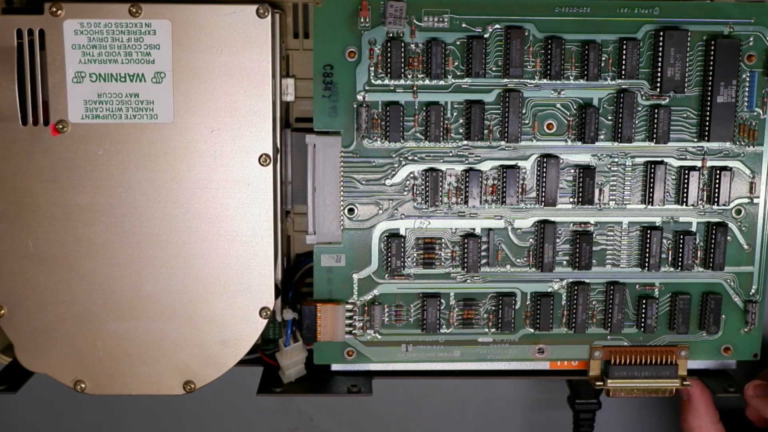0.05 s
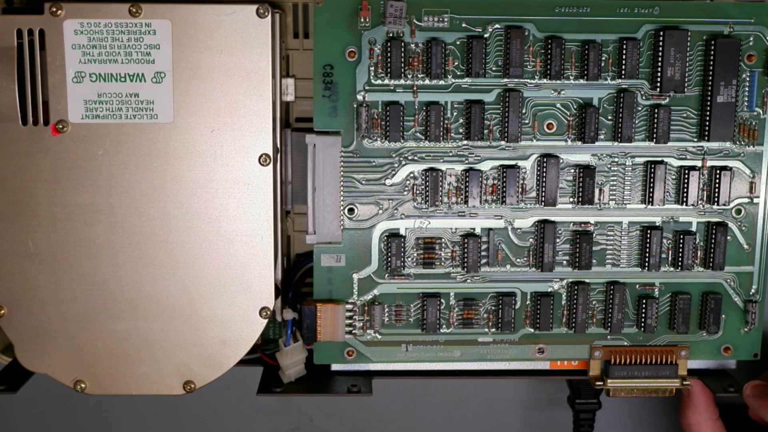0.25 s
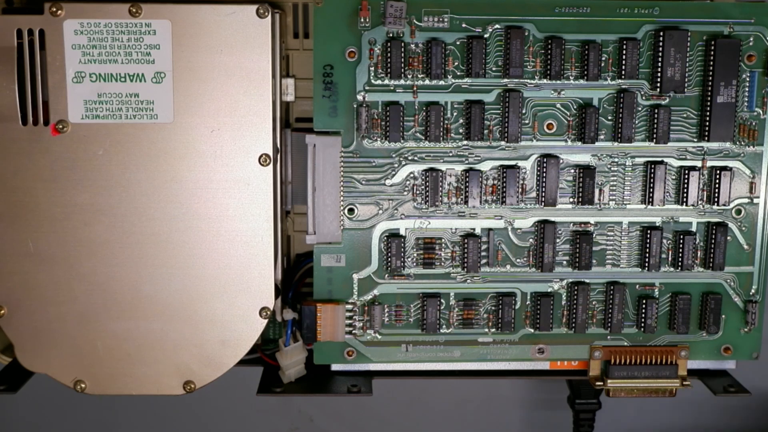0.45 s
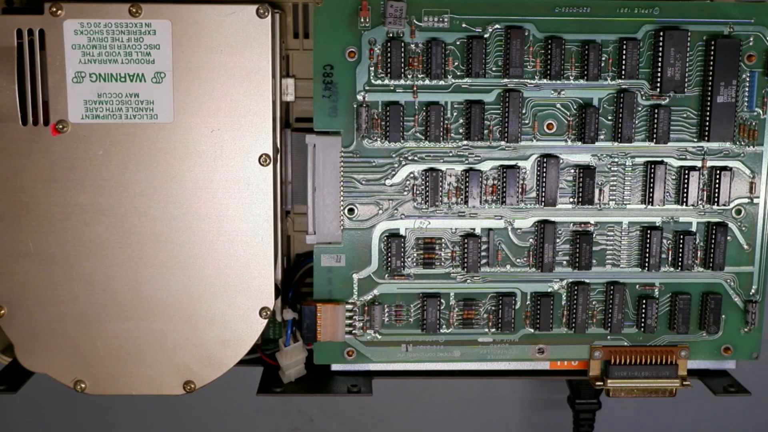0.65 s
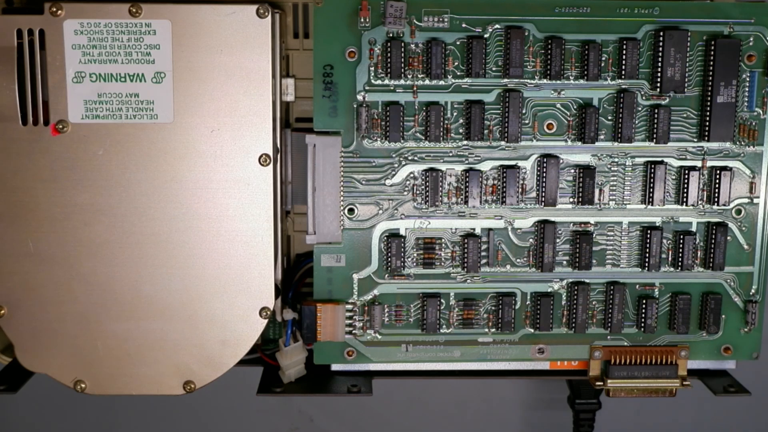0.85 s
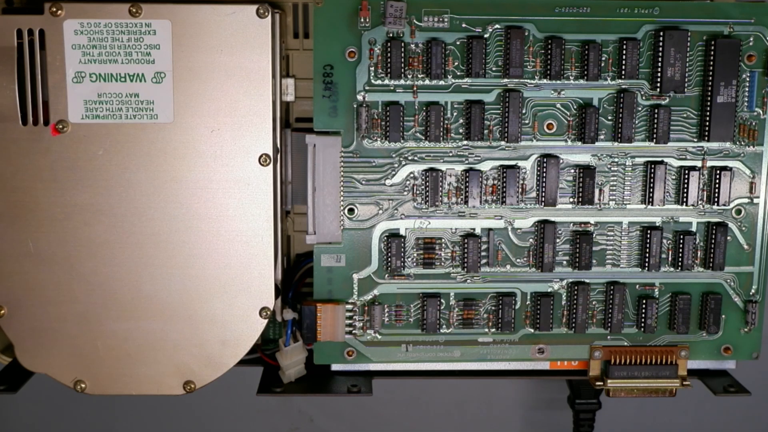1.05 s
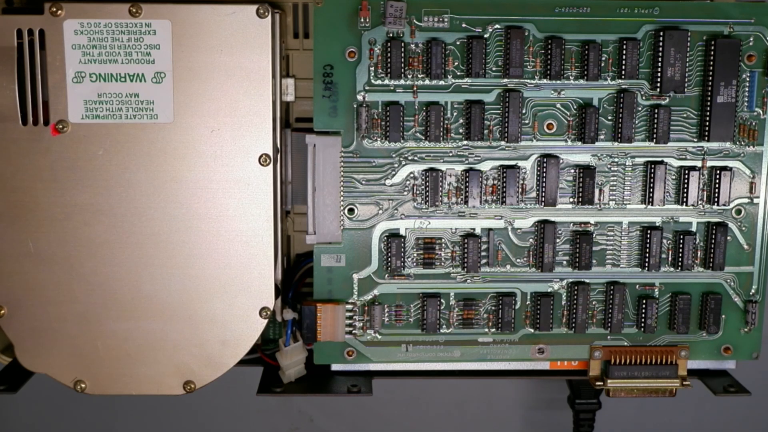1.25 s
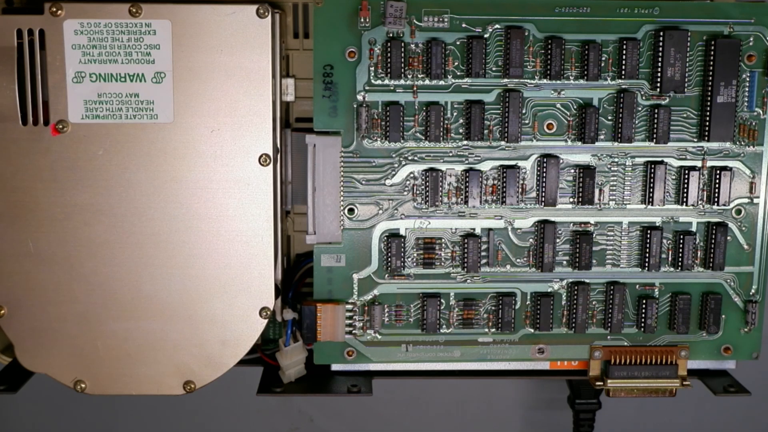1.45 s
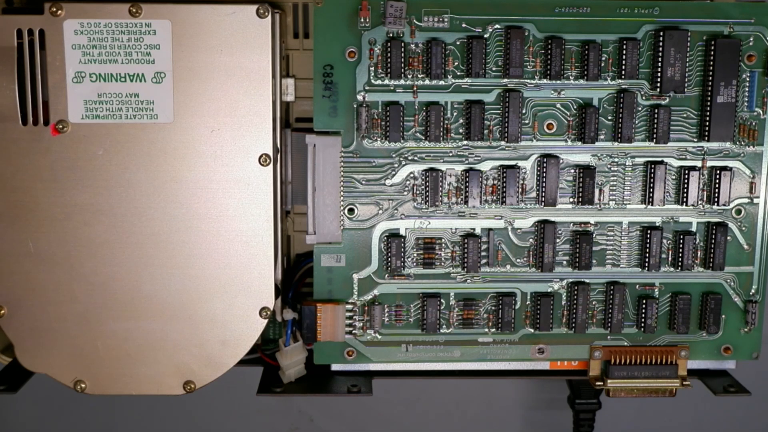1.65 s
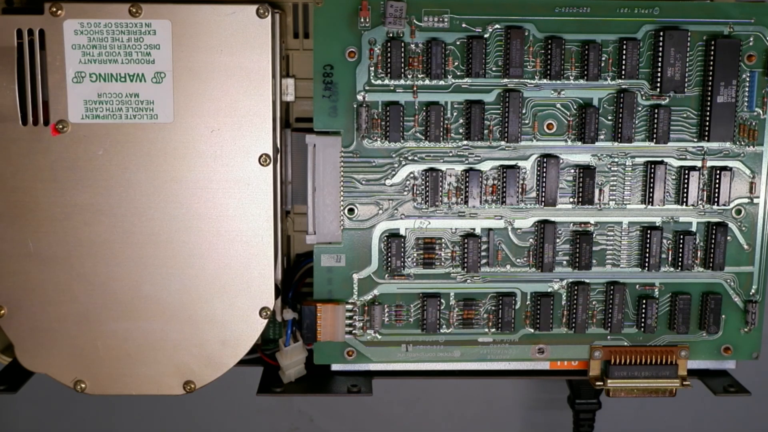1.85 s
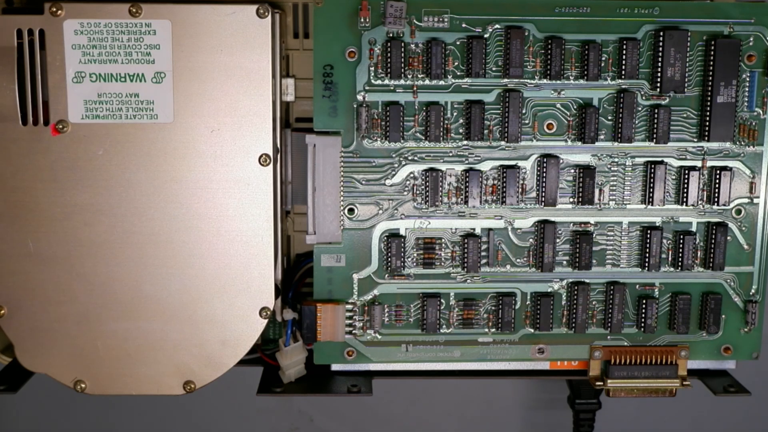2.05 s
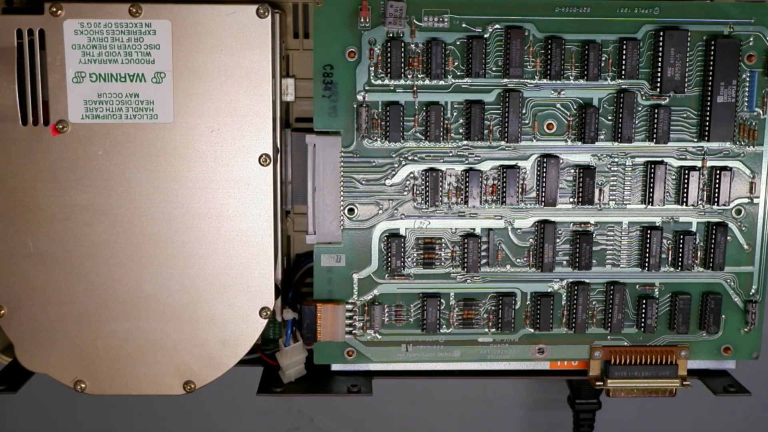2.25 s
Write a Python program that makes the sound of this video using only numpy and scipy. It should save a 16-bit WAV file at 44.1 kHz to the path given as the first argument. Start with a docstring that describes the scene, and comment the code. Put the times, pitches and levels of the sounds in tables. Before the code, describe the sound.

A hard disk drive starts up, heard close in a quiet room. A finger ticks lightly on the power switch, which snaps loudly at about 0.2 seconds, followed by a tiny high squeak. Around 0.7 seconds the disk scuffs loose and begins turning, far quieter than the click. Its bearing groans in uneven throbs while hiss, rasp and a low rising hum grow until about 2.4 seconds.

```python
"""Hard disk drive starting up

An open drive on a bench in a quiet room, one microphone close by. A finger ticks against the power
switch, snaps it over and slips off with a tiny squeak. The spindle breaks loose and gathers speed:
its bearing groans in uneven throbs through the casing, a rasp and a hiss grow, and the rising motor
hum sweeps through a resonance of the chassis."""
import sys
import numpy as np
from scipy import signal
from scipy.fft import rfft, irfft
from scipy.io import wavfile

SR = 44100
rng = np.random.default_rng(int(sys.argv[2]) if len(sys.argv) > 2 else 0)


def dump(signal):
    """Clip the signal to [-1, 1] and save it as 16-bit WAV at the path in sys.argv[1]."""
    limited = np.clip(np.atleast_2d(signal).T, -1, 1)
    pcm = np.round(limited * 32767).astype(np.int16)
    wavfile.write(sys.argv[1], SR, pcm)


N = 105840
TIME = np.arange(N) / SR


def from_db(db):
    """Decibels to gain."""
    return 10 ** (np.asarray(db) / 20)


def unit_rms(x):
    """Scale to rms 1."""
    return x / np.sqrt(np.mean(x ** 2) + 1e-20)


def level(curve):
    """Gain along a curve of (time [s], level [dB]), silent before it begins."""
    return from_db(np.interp(TIME, *np.transpose(curve), left=-140))


def noise(colour):
    """Noise of rms 1 with a colour of (frequency [Hz], relative level [dB])."""
    hz, db = np.transpose(colour)
    bins_hz = np.maximum(np.arange(N // 2 + 1) * SR / N, 1)
    gain = from_db(np.interp(np.log(bins_hz), np.log(hz), db))
    return unit_rms(irfft(rfft(rng.standard_normal(N)) * gain, N))


def wobble(rate_hz):
    """Random drift of rms 1, up to about the given rate."""
    lowpass = signal.butter(2, rate_hz, fs=SR, output="sos")
    return unit_rms(signal.sosfilt(lowpass, rng.standard_normal(N)))


def tone(hz, wander_hz):
    """A sine of height 1 whose pitch wanders a little."""
    return np.sin(2 * np.pi * np.cumsum(hz + wander_hz * wobble(20.3)) / SR)


def friction(resonances):
    """Friction noise of rms 1, coloured by resonances."""
    out = 0
    for hz, width, db in resonances:
        radius = np.exp(-np.pi * width * np.sqrt(2) / SR)
        band = [1 - radius, 0, radius - 1, 1, -2 * radius * np.cos(2 * np.pi * hz / SR), radius ** 2]
        out += from_db(db) * unit_rms(signal.sosfilt([band, band], rng.standard_normal(N)))
    return unit_rms(out)


def decay(start, t60_s):
    """An envelope that jumps to 1 and dies away."""
    return (TIME >= start) * np.exp(-np.log(1000) * np.maximum(TIME - start, 0) / t60_s)


def struck(start, modes):
    """Modes set ringing by one contact, each with a random sign."""
    out = 0
    for hz, db, t60_s in modes:
        envelope = from_db(db) * decay(start, t60_s)
        out += rng.choice([-1, 1]) * envelope * np.sin(2 * np.pi * hz * (TIME - start))
    return out


# Room tone around the bench: (frequency [Hz], relative level [dB])
ROOM_COLOUR = [(15, 8), (35, -3.5), (60, 2), (100, -10.5), (300, -13.5), (800, -17), (2000, -21.5),
               (6000, -24), (12000, -26.5), (16000, -36.5)]

def room(mains_hz=60):
    """The quiet room behind the drive: low rumble and a trace of mains hum."""
    return from_db(-61) * noise(ROOM_COLOUR) + from_db(-69.5) * np.sin(2 * np.pi * mains_hz * TIME)


# Skin on the lever: (time [s], level [dB])
RUB_LEVEL = [(0.185, -62), (0.194, -57.5), (0.3, -57.5), (0.42, -61.5), (0.52, -66.5), (0.62, -73.5),
             (0.7, -97)]
# Its colour: (frequency [Hz], relative level [dB])
RUB_COLOUR = [(100, 0.5), (700, 3.5), (1400, 4), (2500, 5), (5000, -1), (11000, -0.5), (16000, -3.5)]

def finger_rub():
    """A fingertip slides over the switch lever, faint even this close."""
    return level(RUB_LEVEL) * noise(RUB_COLOUR)


# The slipping fingertip: (time [s], pitch [Hz], relative level [dB])
SQUEAK_GLIDE = [(0.3425, 6300, -60), (0.3458, 7500, -42), (0.3478, 10600, -30), (0.350, 12300, -29),
                (0.353, 13000, -41), (0.358, 13200, -65)]
# Ring after the squeak: (frequency [Hz], relative level [dB])
SQUEAK_RING_COLOUR = [(4000, -18), (8500, -22), (11000, -4), (12300, -6), (13400, -3), (15000, -21)]
# Ping as the finger lets go: (frequency [Hz], level [dB], t60 [s])
PING_MODES = [(13400, -50, 0.1)]

def finger_squeak(spread_hz=1100):
    """The finger slips off: a narrow band of noise shoots upward and rings on from its peak."""
    times, hz, db = np.transpose(SQUEAK_GLIDE)
    phase = 2 * np.pi * np.cumsum(np.interp(TIME, times, hz)) / SR
    envelope = from_db(np.interp(TIME, times, db, left=-140, right=-140))
    band = wobble(spread_hz) * np.sin(phase) + wobble(spread_hz) * np.cos(phase)
    release = times[np.argmax(db)]
    ring = from_db(-44) * decay(release, t60_s=0.12) * noise(SQUEAK_RING_COLOUR)
    return envelope * band + ring + struck(release, PING_MODES)


# Finger ticks on the lever: (time [s], relative level [dB])
TICKS = [(0.139, -38.5), (0.1535, -47)]
# The lever's ring: (frequency [Hz], relative level [dB], t60 [s])
LEVER_MODES = [(2820, -17.5, .03), (5480, -21, 0.019), (6659, -17, .025), (8080, -3.5, 0.025),
               (8360, -10, 0.018)]
# The lever tipping: (time [s], level [dB])
CREAK_LEVEL = [(0.218, -64), (0.2215, -50), (0.2245, -54.5), (0.24, -130)]
# Its colour: (frequency [Hz], relative level [dB])
CREAK_COLOUR = [(80, 19.5), (300, 1), (1200, -7), (2600, 10), (4200, -7), (7500, -4.5), (11000, -10.5),
                (16000, -18)]

def switch_lever(attack_s=0.0016):
    """Two light touches ring the lever, then it creaks as it tips over."""
    ticks = 0
    for start, db in TICKS:
        attack = np.clip((TIME - start) / attack_s, 0, 1)
        ticks += from_db(db) * attack * struck(start, LEVER_MODES)
    return ticks + level(CREAK_LEVEL) * noise(CREAK_COLOUR)


# The snap and its bounces: (time [s], relative level [dB])
SNAPS = [(0.225, -13.5), (0.2256, -14), (0.229, -27.5)]
# Ring of switch and frame: (frequency [Hz], relative level [dB], t60 [s])
FRAME_MODES = [(162, -24, .17), (235, -29, .16), (845, -19, .09), (1000, -19, .11), (1853, -11, .1),
               (2137, -4, .048), (2596, -7, .085), (3139, -7, .04), (3575, -14, .07), (5467, -8, .05),
               (6256, -6, .04), (7128, -5, .058), (7610, -6, .056), (7772, -5, .052), (8765, -8, .045),
               (9892, -12, .1), (11380, -7, .055), (13383, -11, .068)]
# The crack, close up: (frequency [Hz], relative level [dB])
CRACK_COLOUR = [(60, -13), (180, -7), (450, -18.5), (1300, -13.5), (2400, 3.5), (4000, -9), (5200, 0.5),
                (8000, 1.5), (10500, -5), (13500, -2), (16000, -15.5)]
# The room's answer: (frequency [Hz], relative level [dB])
TAIL_COLOUR = [(100, -4), (300, -15.5), (600, -1.5), (1000, 8), (2700, -6.5), (4500, -1), (7000, -1),
               (9800, 7), (13500, -4.5), (16000, -14)]

def switch_snap():
    """The switch cracks over near the microphone and bounces; its first hit rings frame and room."""
    crack_power = sum((from_db(db) * decay(start, t60_s=0.035)) ** 2 for start, db in SNAPS)
    crack = from_db(0.5) * np.sqrt(crack_power) * noise(CRACK_COLOUR)
    first_hit, hit_db = SNAPS[0]
    ring = from_db(hit_db - 5.5) * struck(first_hit, FRAME_MODES)
    tail = from_db(-27) * decay(first_hit, t60_s=0.12) * noise(TAIL_COLOUR)
    return crack + ring + tail


# The spindle breaking loose: (time [s], level [dB])
SCUFF_LEVEL = [(0.715, -83), (0.742, -54), (0.765, -59), (0.8, -76)]
# Its colour: (frequency [Hz], relative level [dB])
SCUFF_COLOUR = [(200, -4), (550, -13), (820, 1.5), (1150, -10), (1500, -18), (2100, -10), (4000, -27),
                (10500, -21.5), (15000, -29)]
# Hiss of the turning spindle: (time [s], level [dB])
HISS_LEVEL = [(0.835, -76), (0.86, -58), (1.2, -56.5), (1.8, -56.5), (2.4, -55.5)]
# Its colour: (frequency [Hz], relative level [dB])
HISS_COLOUR = [(80, 5), (230, 3), (380, 3), (900, 2), (2200, -1), (3000, -2), (4500, -4), (7000, -7),
               (11000, -9), (15500, -10.5)]
# The growing rasp: (time [s], relative level [dB])
RASP_LEVEL = [(0.82, -92), (0.88, -71), (1.11, -69.5), (1.17, -61), (1.6, -57.5), (2.4, -52.5)]
# Its brief swells and one dip: (time [s], level change [dB])
RASP_SWELLS = [(1.5, 6), (1.695, -3), (1.835, 4.5), (1.9, 6), (1.995, 3.5), (2.105, 10), (2.18, 3),
               (2.254, 3), (2.375, 4.5)]
# Resonances of the cover: (frequency [Hz], nominal width [Hz], relative level [dB])
COVER_RESONANCES = [(780, 182, -3), (1136, 17, -3.5), (1268, 155, -2.5), (1381, 64, -6.5), (1620, 96, -6.5),
                    (1895, 217, 0)]

def spindle(swell_s=0.011, flutter_db=2.5):
    """The spindle scuffs free, then turns with a fluttering rasp in the cover and a smooth hiss."""
    scuff = level(SCUFF_LEVEL) * noise(SCUFF_COLOUR)
    swell_db = sum(db * np.exp(-0.5 * ((TIME - centre) / swell_s) ** 2) for centre, db in RASP_SWELLS)
    unevenness = from_db(swell_db + flutter_db * wobble(rate_hz=70))
    rasp = level(RASP_LEVEL) * unit_rms(friction(COVER_RESONANCES) * unevenness)
    hiss = level(HISS_LEVEL) * noise(HISS_COLOUR)
    return scuff + rasp + hiss


# The motor gathering speed: (time [s], pulse rate [Hz])
MOTOR_RATE = [(0.74, 14), (1.4, 77), (1.52, 83), (1.6, 92), (1.95, 119), (2.3, 150), (2.38, 161)]
# First and second order of its hum: (relative level [dB])
ORDERS_DB = [-71.5, -73.5]

def motor(chassis_hz=165, width_hz=5.8, lift_db=23.5):
    """Rising hum; each order booms as it nears the chassis resonance."""
    rate = np.interp(TIME, *np.transpose(MOTOR_RATE), left=0)
    phase = 2 * np.pi * np.cumsum(rate) / SR
    hum = 0
    for order, db in enumerate(ORDERS_DB, 1):
        hz = order * rate
        resonance = from_db(lift_db) / np.hypot(1, 2 * (hz - chassis_hz) / width_hz)
        bass_rolloff = np.minimum(hz / chassis_hz, 1)
        hum += from_db(db) * np.hypot(1, resonance) * bass_rolloff * np.sin(order * phase)
    return hum


# The bearing's groan: (time [s], relative level [dB])
GROAN_LEVEL = [(0.7, -88), (0.8, -65), (0.88, -58.5), (0.95, -55), (1.2, -51.5), (1.5, -49.5), (2.4, -49)]
# Resonances of the casing: (frequency [Hz], nominal width [Hz], relative level [dB])
CASING_RESONANCES = [(513, 19.5, -8.5), (570.7, 23.5, 0), (665, 136, -15.5)]
# Throbs of the bearing: (time [s], relative level [dB])
THROBS = [(0.937, -37.5), (1.0, -47.5), (1.035, -43), (1.065, -41.5), (1.087, -41.5), (1.133, -38),
          (1.148, -38.5), (1.175, -37.5), (1.201, -40), (1.215, -43), (1.252, -39), (1.287, -39),
          (1.322, -33), (1.356, -34.5), (1.42, -35), (1.448, -39.5), (1.48, -36), (1.535, -34.5),
          (1.586, -36), (1.613, -38.5), (1.638, -34), (1.66, -41.5), (1.696, -34), (1.7345, -37),
          (1.75, -40), (1.772, -37.5), (1.793, -38), (1.83, -38.5), (1.87, -40), (1.901, -35), (1.932, -36),
          (1.962, -34.5), (2.022, -37), (2.052, -35.5), (2.065, -39), (2.107, -32.5), (2.134, -37),
          (2.161, -33.5), (2.193, -39), (2.215, -36.5), (2.244, -39), (2.267, -36), (2.295, -34.5),
          (2.343, -38), (2.368, -36), (2.387, -37)]

def bearing(throb_s=0.014, lead_s=0.0022):
    """Close up, the bearing groans and whines through the casing under a tone that throbs unevenly."""
    effort = level(GROAN_LEVEL)
    groan = from_db(-6.5) * friction(CASING_RESONANCES)
    whine = from_db(-6) * tone(hz=508, wander_hz=3)
    throbbing = from_db(-9) * effort  # the tone never quite stops between throbs
    for time, db in THROBS:
        progress = np.clip((TIME - time + lead_s) / throb_s, 0, 1)
        throbbing += from_db(db - 3) * np.sin(np.pi * progress) ** 2
    return effort * (groan + whine) + throbbing * tone(hz=571, wander_hz=5)


def scene():
    """Room, switch and drive as they reach one microphone at the bench."""
    switching_on = finger_rub() + finger_squeak() + switch_lever() + switch_snap()
    drive = spindle() + motor() + bearing()
    return (room() + switching_on + drive)[None]


def record(dry, ceiling=0.8, cutoff_hz=15800):
    """The microphone chain rounds the loudest peaks and cuts the top steeply."""
    rounded = ceiling * np.tanh(dry / ceiling)
    lowpass = signal.ellip(10, 0.1, 80, cutoff_hz, fs=SR, output="sos")
    return signal.sosfilt(lowpass, rounded)


dry = scene()
out = record(dry)
dump(out)
```